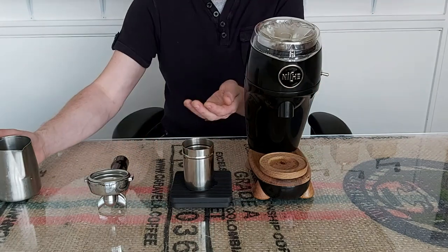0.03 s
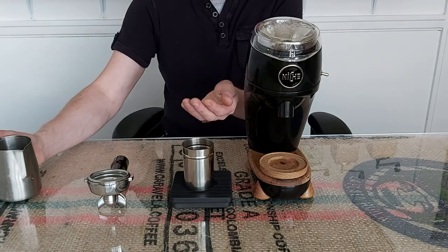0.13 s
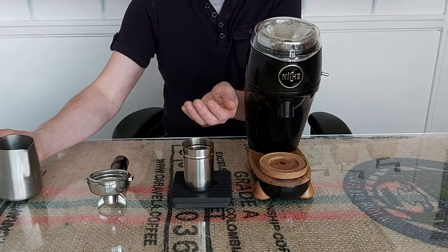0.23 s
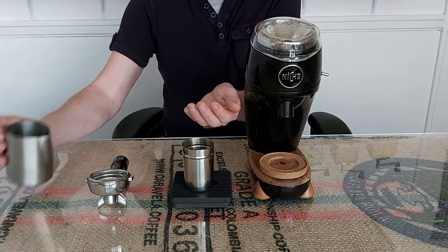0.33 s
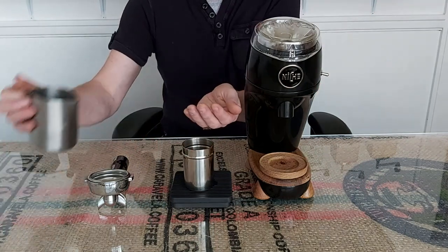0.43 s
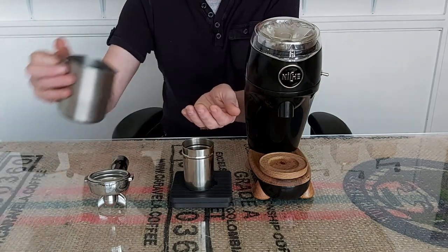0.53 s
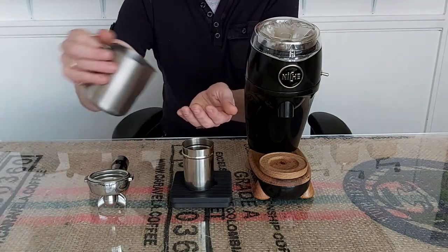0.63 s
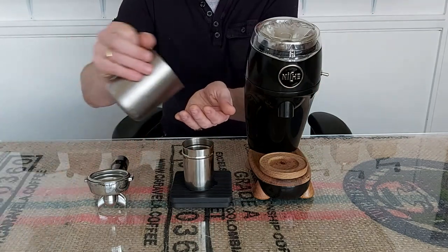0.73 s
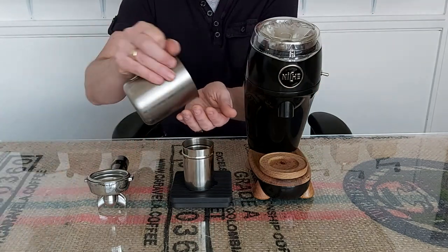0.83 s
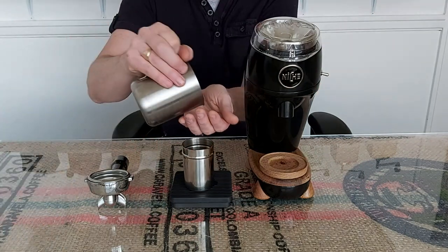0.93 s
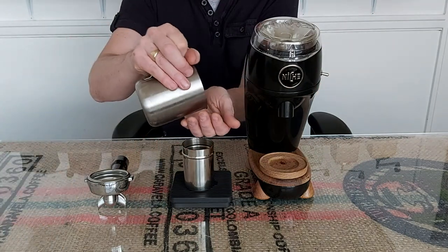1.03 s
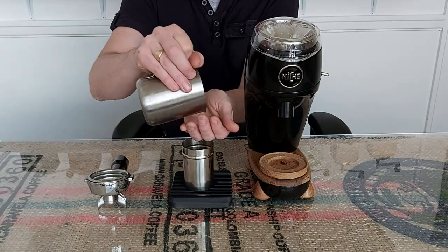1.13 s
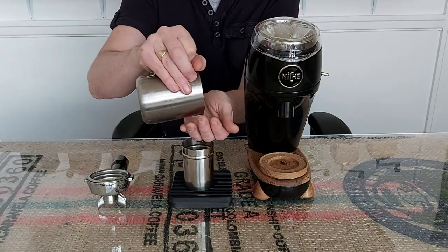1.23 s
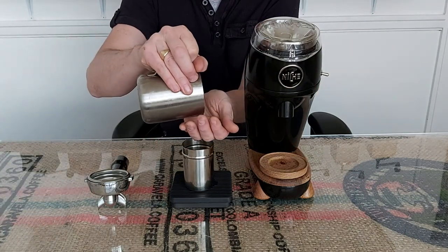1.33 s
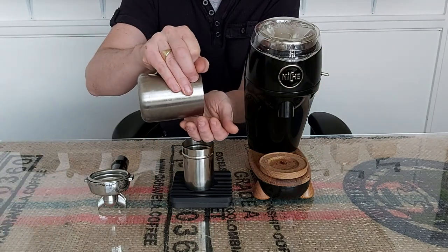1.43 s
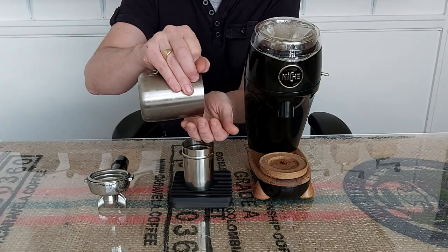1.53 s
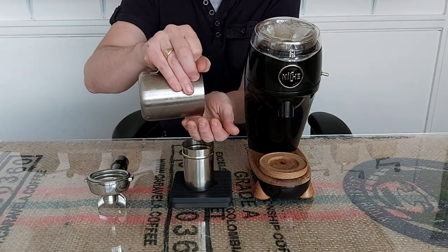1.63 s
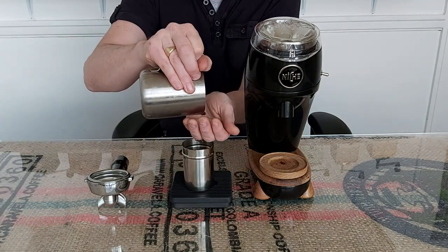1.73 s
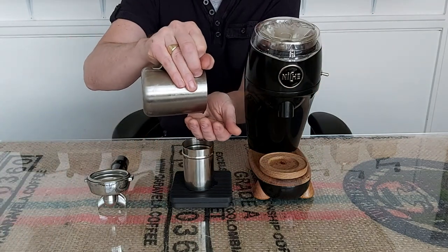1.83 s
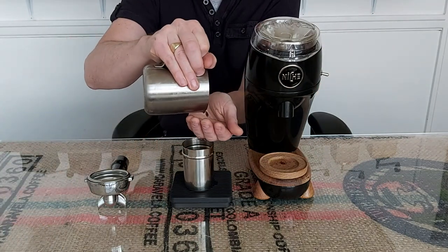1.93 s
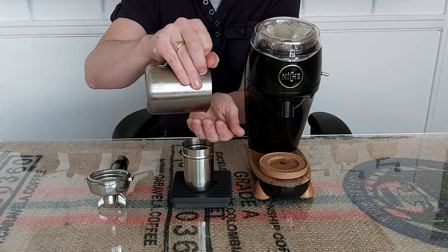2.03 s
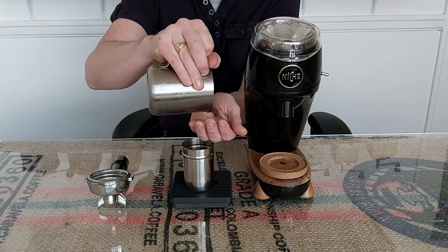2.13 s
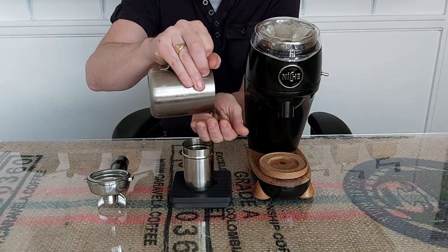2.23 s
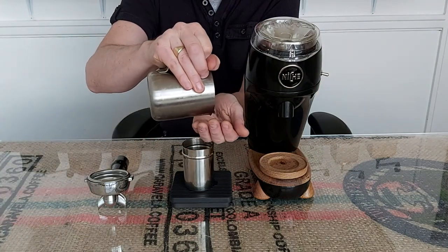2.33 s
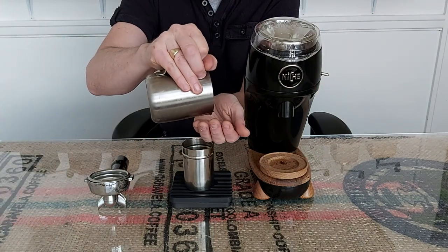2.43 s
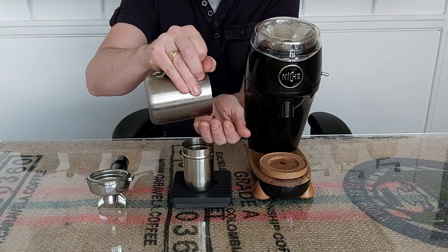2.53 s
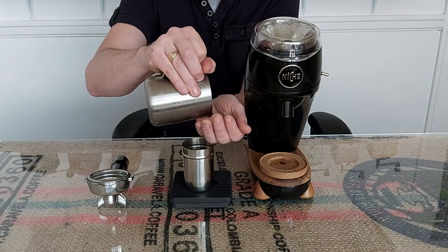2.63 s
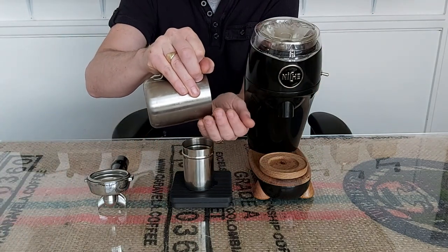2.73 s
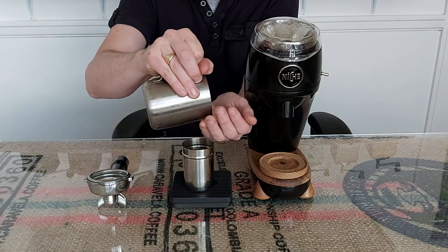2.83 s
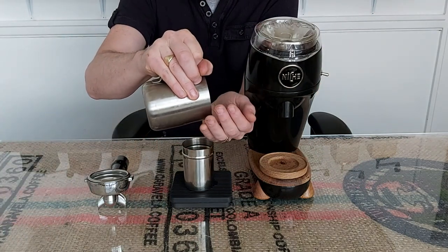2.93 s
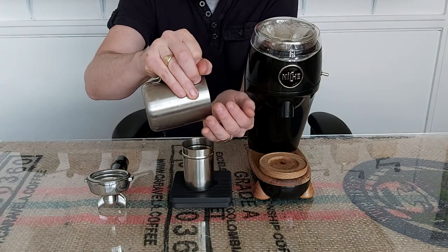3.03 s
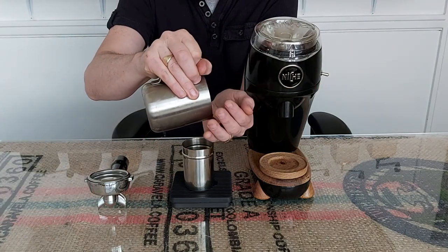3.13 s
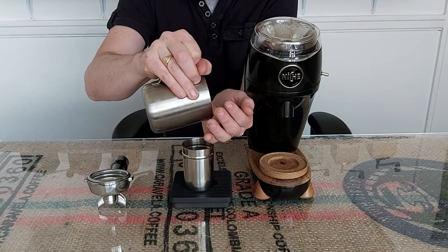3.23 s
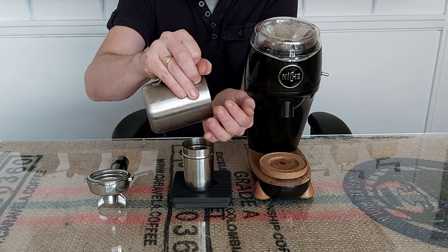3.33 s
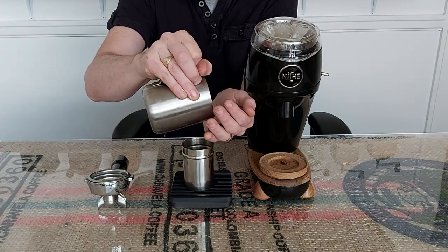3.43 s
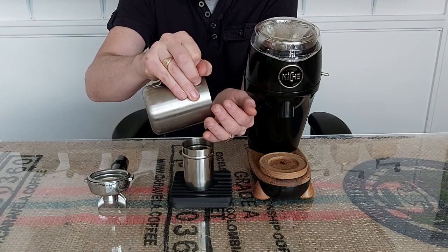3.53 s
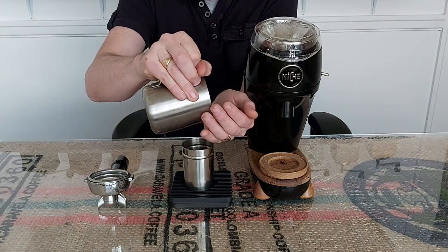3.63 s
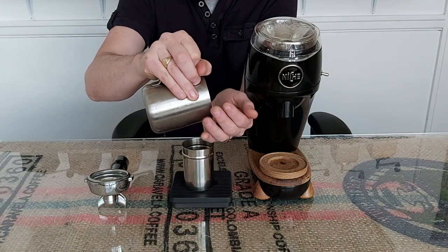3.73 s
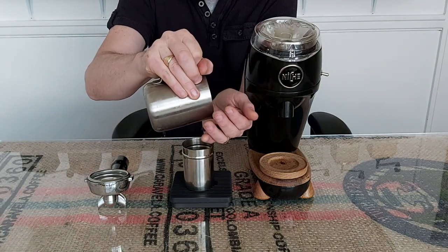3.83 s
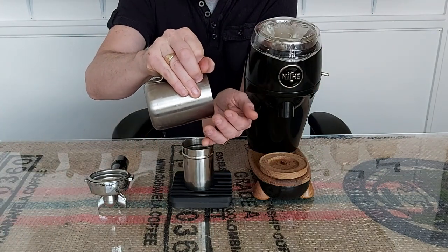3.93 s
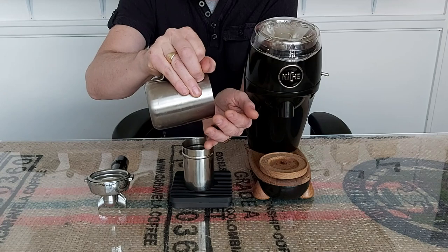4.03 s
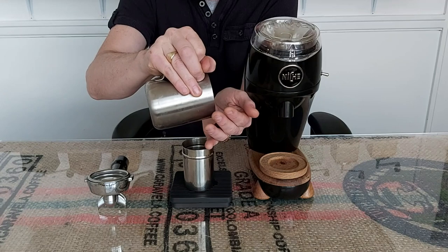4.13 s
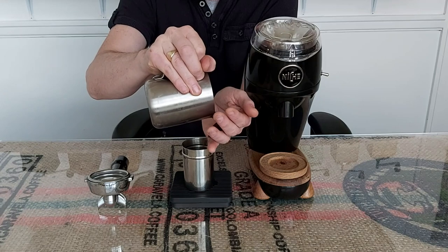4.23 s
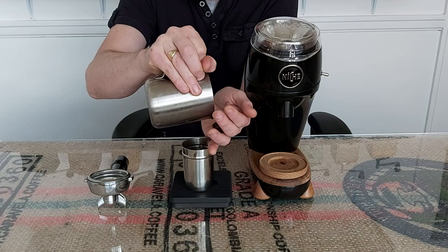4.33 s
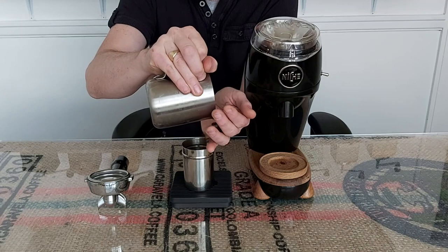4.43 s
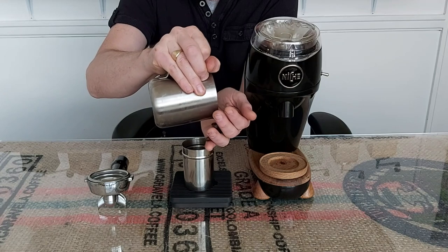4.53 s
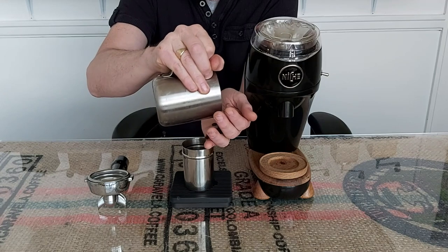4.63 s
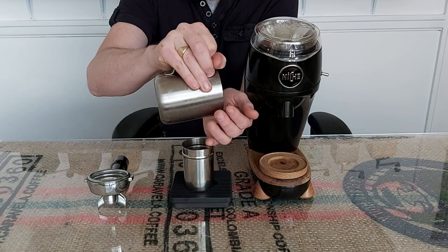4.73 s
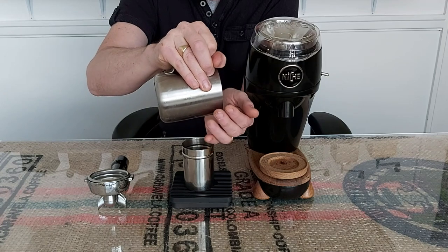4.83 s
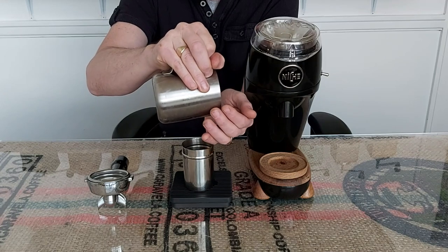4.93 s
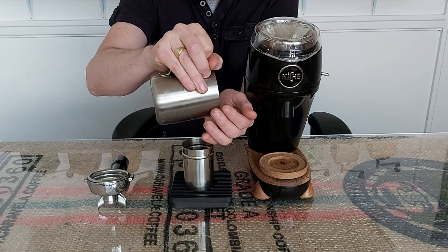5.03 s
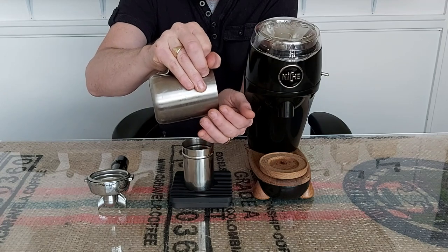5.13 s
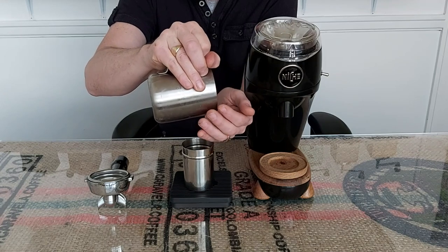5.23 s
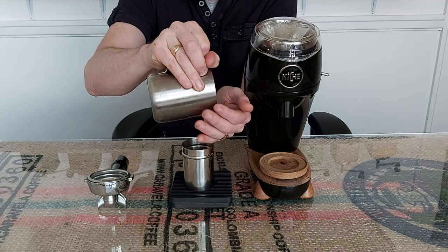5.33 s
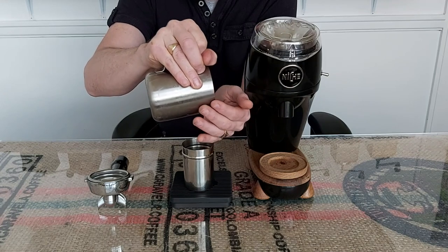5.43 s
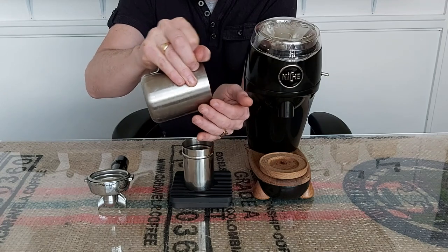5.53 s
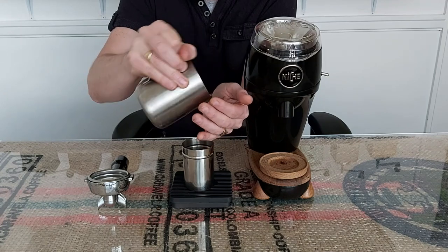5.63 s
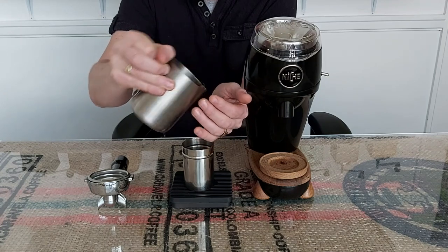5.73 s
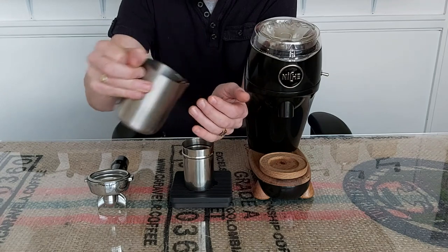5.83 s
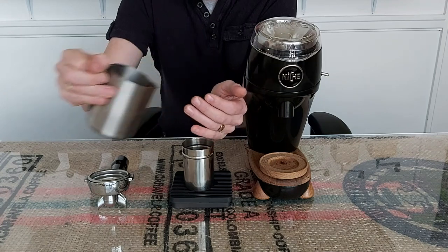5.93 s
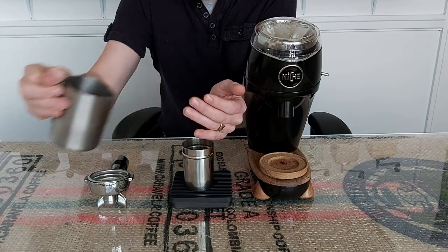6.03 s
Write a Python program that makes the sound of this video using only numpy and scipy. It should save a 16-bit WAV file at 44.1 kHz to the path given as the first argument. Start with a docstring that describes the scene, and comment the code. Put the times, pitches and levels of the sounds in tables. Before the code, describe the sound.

A jug is picked up with soft taps and sleeve rustle, and beans rattle lightly in its steel body. After dry ticks in the hand and a handling bump, louder bright clinks land in a small metal cup, the ring shortening as it fills. A few stray beans bounce hard on the table. Near microphone, short hard-walled kitchen reverb, very low hum and distant engine.

```python
"""Coffee beans slide and rattle in a tilted steel jug, trickle over a hand and drop into a small steel cup.
They click on the cup floor, ring its wall, tick in the palm, and a few skip over the table top; sleeves rub,
a mid-band wash swells with the beans, and an engine far outside drones past a quiet kitchen with a low hum.
Bean hits are sums of decaying sines; cloth, wash, rumble and air are shaped noise; drone and hum are wavering sines.
"""
import sys
import numpy as np
from scipy import signal
from scipy.fft import rfft, irfft
from scipy.io import wavfile
from scipy.ndimage import uniform_filter1d

SR = 44100
rng = np.random.default_rng(int(sys.argv[2]) if len(sys.argv) > 2 else 0)


def dump(signal):
    """Clip the signal to [-1, 1] and save it as 16-bit WAV at the path in sys.argv[1]."""
    limited = np.clip(np.atleast_2d(signal).T, -1, 1)
    pcm = np.round(limited * 32767).astype(np.int16)
    wavfile.write(sys.argv[1], SR, pcm)


N = 268965

MODE_DB = -19  # one mode of a click re the level listed for its bean
EMPTY_UNTIL_S = 3.1  # from here on the filling cup damps its own ring


def undb(db):
    """Amplitude of a level in dB."""
    return 10 ** (np.asarray(db) / 20)


def unit(x):
    """Scale to rms 1."""
    return x / np.sqrt(np.mean(x ** 2))


def decay(t, t60):
    """Exponential envelope that falls 60 dB in t60 seconds."""
    return np.exp(-np.log(1000) * t / t60)


def curves(breakpoints):
    """Columns of a breakpoint list, read at every sample."""
    s, *columns = np.transpose(breakpoints)
    return [np.interp(np.arange(N) / SR, s, c) for c in columns]


def band(lo_hz, hi_hz):
    """Noise of rms 1 between two edges."""
    sos = signal.butter(2, [lo_hz, hi_hz], "band", fs=SR, output="sos")
    return unit(signal.sosfilt(sos, rng.standard_normal(N)))


def walk(rate):
    """Random levels that glide to a new value every 1 / rate s; rms 1."""
    k = int(SR / rate)
    steps = np.repeat(rng.standard_normal(N // k + 1), k)
    return unit(uniform_filter1d(steps, k)[:N])


def wavering_sine(hz, drift_hz, rate):
    """Sine whose pitch drifts at random around hz."""
    return np.sin(2 * np.pi * np.cumsum(hz + drift_hz * walk(rate)) / SR)


def air():
    """The quiet kitchen: noise shaped in the spectrum, and a low fridge hum that wavers."""
    # kitchen tone: f/Hz, spectral weight/dB
    kitchen = [(30, -37), (42, 1), (137, -12), (313, -18), (426, -41), (537, -14), (595, -31), (810, -38),
               (1710, -31), (10100, -27), (14500, -39), (16500, -58)]
    kitchen_db, fridge_db = -70.5, -69.5
    f = np.maximum(np.fft.rfftfreq(N, 1 / SR), 1)
    hz, db = np.transpose(kitchen)
    weight = undb(np.interp(np.log(f), np.log(hz), db))
    hiss = unit(irfft(rfft(rng.standard_normal(N)) * weight, N))
    hum = wavering_sine(47.5, 0.81, rate=2.2)
    return undb(kitchen_db) * hiss + undb(fridge_db + 2.5 * walk(6.8)) * hum


def engine():
    """A drone that grows as the engine nears and swells once, its low rumble, and tyre roar."""
    # engine outside: t/s, rumble level/dB, road roar level/dB
    passing = [(0, -63, -74), (.24, -71, -65), (.4, -76, -67.5), (1.7, -80.5, -68.5), (1.97, -114, -75),
               (2.44, -79, -73.5), (2.6, -66.5, -69), (3.4, -82, -75.5), (3.94, -70, -63),
               (4.3, -73.5, -66.5), (4.55, -68.5, -54.5), (4.8, -77.5, -57), (5.05, -62, -56),
               (5.7, -62.5, -54.5), (6.1, -61.5, -56)]
    start_db, growth_db_per_s = -69.5, 2
    swell_s, swell_width_s, swell_db = 5.45, 0.19, -43.5
    t = np.arange(N) / SR
    rumble_db, roar_db = curves(passing)
    size = undb(start_db + growth_db_per_s * t + 0.7 * walk(7.3))
    size += undb(swell_db) * np.exp(-((t - swell_s) / swell_width_s) ** 2)
    drone = wavering_sine(62.3, 0.724, rate=3.05)
    rumble = band(174.5, 196.0) + 0.41 * band(106, 140.0) + .5 * band(254, 259) + 1.04 * band(90, 232)
    roar = undb(roar_db + 1.0 * walk(13)) * band(600, 1067)
    return size * drone + undb(rumble_db) * rumble + roar


def wash():
    """A flickering mid-band noise that swells with the sliding beans and the table thuds."""
    # swells of the wash: t/s, level/dB
    swells = [(0, -89), (.22, -65), (.6, -73.5), (1.15, -67.5), (1.48, -60.5), (1.72, -57.5), (1.95, -73.5),
              (2.3, -59.5), (2.46, -72), (2.65, -65.5), (3.1, -62), (3.45, -84), (3.9, -62.5), (4.35, -71),
              (4.7, -51.5), (5.05, -48.5), (5.5, -74.5), (6.1, -75)]
    level_db, = curves(swells)
    return undb(level_db + 2.5 * walk(60)) * band(955, 2400)


def sleeves():
    """Cloth rubs as an arm moves: a hollow body near 350 Hz and a thin hiss."""
    # sleeve rubs: t/s, length/s, level/dB
    rubs = [(0.195, 0.57, -58.5), (1.18, 0.051, -61.5), (2.5, 0.32, -60.5), (2.966, 0.14, -57),
            (3.45, 0.046, -64), (3.762, 0.8, -67), (4.655, 0.21, -71), (5.296, 1, -67)]
    rise_db_per_s, fall_db_per_s, hiss_db = 296, 92, -15
    t = np.arange(N) / SR
    move = np.zeros(N)
    for s, length, db in rubs:
        before, after = np.maximum(s - t, 0), np.maximum(t - s - length, 0)
        move += undb(db - rise_db_per_s * before - fall_db_per_s * after)
    cloth = band(285, 389) + 0.63 * band(162, 630) + undb(hiss_db) * band(3300, 10700)
    return move * undb(1.0 * walk(9.7) + 2.0 * walk(30)) * cloth


def handling():
    """Hands on jug and table: taps and scuffs of band noise that start sharply and die away."""
    # touches: t/s, level at the onset/dB, centre f/Hz, width/Hz, t60/s
    touches = [(0.209, -49, 900, 1390, 0.021), (0.247, -50, 700, 1090, 0.12), (0.47, -49, 1480, 1190, .03),
               (.468, -55, 1520, 120, 0.37), (.47, -50, 10300, 1500, 0.033), (0.891, -54, 1350, 1350, 0.45),
               (2.476, -62, 350, 285, 0.15), (3.024, -49, 696, 890, 1), (3.025, -47.5, 2370, 3120, 0.56),
               (3.025, -49.5, 8900, 10700, .4), (3.415, -55, 396, 302, 0.19)]
    t = np.arange(N) / SR
    out = np.zeros(N)
    for s, db, hz, width_hz, t60 in touches:
        envelope = (t > s) * decay(np.abs(t - s), t60)
        noise = band(max(hz - width_hz / 2, 100), hz + width_hz / 2)
        out += undb(db + 0.47 * walk(150)) * envelope * noise
    return out


def strike(s, mode_db, modes, scatter_db, size=2000):
    """Every blow rings the modes (f/Hz, level/dB, t60/s) with its own strengths and signs."""
    hz, db, t60 = np.array(modes).T[:, :, None]
    t = np.arange(size) / SR
    chance = rng.standard_normal((len(s), 2, len(modes)))
    level_db = np.reshape(mode_db, (len(s), -1)) + db.T + scatter_db * chance[:, 0]
    gain = undb(level_db) * np.sign(chance[:, 1])
    blows = gain @ (decay(t, t60) * np.sin(2 * np.pi * hz * t))
    out = np.zeros(N + size)
    for at, blow in zip(np.clip(s * SR, 0, N).astype(int), blows):
        out[at:at + size] += blow
    return out[:N]


def clicks(s, db, hz, modes, hollow, dense_db, dense_t60_s, fall_db, ring_db=0, hollow_db=0, low_hz=2700):
    """Bean clicks: strong modes amid a thicket of short ones, loudest near hz, and any air inside."""
    focus_db, focus_octaves = 5.5, .1  # each click favours the short modes right at its brightest pitch
    thicket_hz = np.linspace(2900, 16000, num=70) + rng.normal(0, 61, size=70)
    thicket = [(f, dense_db, dense_t60_s * (6000 / f) ** .5) for f in thicket_hz]
    strong = np.arange(len(modes) + len(thicket)) < len(modes)
    modes = list(modes) + thicket
    octaves = np.log2(np.array(modes)[:, 0] / hz[:, None])
    mode_db = db[:, None] - fall_db * octaves ** 2
    mode_db = mode_db + ~strong * focus_db * np.exp(-(octaves / focus_octaves) ** 2)
    mode_db = mode_db + np.outer(ring_db, strong)
    shell = strike(s, mode_db, modes, 2.96)
    # so small a contact radiates no bass
    shell = signal.sosfilt(signal.butter(6, low_hz, "high", fs=SR, output="sos"), shell)
    if len(hollow) == 0:
        return shell
    return shell + strike(s, db + hollow_db, hollow, 3.9, size=6000)


def heap(flow, spread_db, count):
    """Times, levels and pitches of a random patter, mostly faint, that follows the flow."""
    s, db = np.transpose(flow)
    place, size, pitch = rng.random((count, 3)).T
    at = s[0] + place * (s[-1] - s[0])
    level_db = np.interp(at, s, db) - spread_db * np.log(1 - size)
    return at, level_db, 4000 * 3.5 ** pitch


def table():
    """Dry ticks of beans skipping over the table and the softer, slower thud of the top under them."""
    # beans that miss the cup: t/s, level/dB, thud re that level/dB
    spills = [(4.4807, -29, -20), (4.563, -4.5, -17.5), (4.6558, -10, -18), (4.661, -6.5, -14.5),
              (4.6957, -12, -23), (4.7067, -4.5, -15.5), (4.7895, -14.5, -8.5), (4.809, -14, -25),
              (4.8284, -15.5, -7.5), (4.8564, -12, -16), (4.8918, -10.5, -12.5), (4.9477, -12, -9),
              (4.9756, -18.5, -26), (4.9904, -24, -30), (4.9984, -23, -19), (5.005, -16, -10),
              (5.0304, -31, -22), (5.0664, -18, -10.5), (5.0724, -30, -14), (5.0804, -20.5, -8),
              (5.1018, -32, -19), (5.1114, -25, -14), (5.1228, -25, -20), (5.1344, -30, -3.5),
              (5.1437, -26, -11), (5.1562, -29, -14), (5.1644, -27, -8.5), (5.1756, -22.5, -10)]
    # modes of the table top: f/Hz, level/dB, t60/s
    top_modes = [(448, -29, 0.032), (670, -16.5, 0.03), (987, -18.5, 0.025), (1366, -11.5, 0.018),
                 (1700, -9, 0.026), (2220, -1, 0.008), (2700, -7.5, 0.0094)]
    brightest_hz, push_s = 8420, 0.000085  # push_s: time constant of the soft contact
    s, db, thud_db = np.transpose(spills)
    push = np.arange(400) / SR / push_s
    contact = push * np.exp(-push) / (push_s * SR)
    thud = np.convolve(strike(s, db + thud_db, top_modes, 4.0), contact)[:N]
    thud = signal.sosfilt(signal.butter(2, 350, "high", fs=SR, output="sos"), thud)
    return clicks(s, db + MODE_DB, brightest_hz + 0 * s, [], [], -4.0, 0.013, 11.2) + thud


def palm():
    """Bean on bean in the palm: dry ticks that ring no steel."""
    # ticks: t/s, level/dB, brightest f/Hz
    ticks = [(2.0212, -43.5, 7530), (2.3344, -35, 13600), (2.3467, -28.5, 9370), (2.361, -27.5, 12100),
             (2.368, -32, 9600), (2.3744, -29, 12200), (2.3814, -35, 11400), (2.4002, -34.5, 7040),
             (2.453, -34, 10900), (2.4723, -35, 11600), (2.492, -45, 9310), (2.5476, -60, 7800),
             (2.6394, -30, 14300), (2.6474, -33.5, 7970), (2.715, -43, 7740), (2.8818, -49, 7800),
             (2.901, -35.5, 11900), (3.347, -39.5, 11300), (3.3774, -51, 7270)]
    s, db, hz = np.transpose(ticks)
    return clicks(s, db + MODE_DB, hz, [], [], -1.8, 0.012, 6.8)


def jug():
    """Single knocks on steel over the patter of the sliding heap; the tipped mouth lets the air sound out."""
    # beans knocking in the jug: t/s, level/dB, brightest f/Hz
    hits = [(0.8743, -44, 9350), (0.8914, -27.5, 4960), (0.932, -29.5, 5370), (0.9521, -28, 7200),
            (0.9622, -17, 7200), (0.985, -42, 7290), (0.992, -19, 9900), (1.0106, -22, 10100),
            (1.021, -23.5, 9700), (1.054, -26, 7250), (1.0848, -32, 5720), (1.1023, -25.5, 10200),
            (1.113, -28.5, 7200), (1.1455, -33.5, 5720), (1.196, -38, 5950), (1.2044, -31, 7740),
            (1.276, -27.5, 10100), (1.295, -35, 12700), (1.3139, -33.5, 12800), (1.3356, -45, 10300),
            (1.3568, -36.5, 7060), (1.3688, -32, 7560), (1.3826, -34, 7800), (1.4116, -29, 6200),
            (1.45, -23, 6400), (1.505, -25, 7240), (1.5272, -26, 7280), (1.5566, -35, 7740),
            (1.6034, -42, 7300), (1.6198, -33, 7700), (1.6623, -27, 10400), (1.674, -33, 10400),
            (1.705, -29.5, 10100), (1.717, -26, 6100), (1.7421, -35, 6800), (1.7597, -27, 9700),
            (1.8113, -34.5, 7450), (1.833, -39, 5660), (1.86, -30, 8180), (1.8715, -27, 6200),
            (1.9016, -29, 8100), (1.9375, -41, 7460), (2.0353, -42.5, 7600), (2.074, -43, 4590),
            (2.0929, -30, 6690), (2.127, -35, 6620), (2.1484, -30, 7660), (2.1945, -24, 7750),
            (2.2345, -18.5, 5960), (2.2804, -30, 7760), (2.3006, -24, 7800), (2.5799, -34, 6000),
            (2.6742, -38, 4950), (2.7354, -38.5, 5400), (2.7633, -40, 4730), (3.1465, -26.5, 6200),
            (3.1844, -30, 5900), (3.1979, -30, 5930), (3.2345, -37.5, 6050), (3.2817, -43, 6720)]
    # small clicks of the moving heap: t/s, level of the faintest/dB
    sliding = [(0.68, -91), (.77, -73), (0.85, -89), (1.05, -67.5), (1.31, -75.5), (1.58, -54.5),
               (1.92, -99), (2.13, -57.5), (2.25, -54), (2.42, -77.5), (2.76, -91), (3.0, -90), (3.2, -87),
               (3.4, -90)]
    # steel of the jug: f/Hz, level/dB, t60/s
    steel = [(3500, -2, 0.054), (4740, -2, 0.047), (5390, 2.5, 0.028), (5630, -4, 0.04), (5870, -1, 0.048),
             (6740, 0, 0.023), (7200, -3.5, 0.05), (7420, 0, 0.042), (7780, 1, 0.037), (9810, -1, 0.022),
             (10230, -1, 0.08), (11800, 1.5, 0.021), (13300, -5, .02)]
    # air inside the jug: f/Hz, level/dB, t60/s
    inside = [(670, -19, 0.097), (1231.3, -7.5, 0.063), (1524, -11, 0.02), (2490, -17, 0.067)]
    tilted_s, upright_db = 1.3, -11  # the air is quieter until the jug is tilted
    s, db, hz = np.transpose(hits)
    knocks = clicks(s, db + MODE_DB, hz, steel, inside, -8.0, 0.034, 4.25,
                    low_hz=3460, hollow_db=upright_db * (s < tilted_s))
    s, db, hz = heap(sliding, 2.6, count=1100)
    patter = clicks(s, db, hz, steel, inside, -7.5, 0.027, 13.3,
                    low_hz=3280, hollow_db=upright_db * (s < tilted_s))
    return knocks + patter


def cup_floor():
    """Beans click on the cup floor, and those already in the cup deaden it for the later drops."""
    # beans landing in the cup: t/s, level/dB, brightest f/Hz
    drops = [(3.4164, -12.5, 13150), (3.491, -38, 11400), (3.5427, -27, 7540), (3.6177, -37, 5400),
             (3.6631, -5.5, 13150), (3.6825, -23, 7460), (3.702, -11, 7300), (3.7174, -19.5, 9630),
             (3.7622, -15.5, 7200), (3.791, -5.5, 7100), (3.8034, -17, 7350), (3.8192, -13, 12100),
             (3.8323, -22, 7600), (3.8863, -25, 5500), (3.9654, -14.5, 5330), (4.0314, -32, 5900),
             (4.0517, -34, 5840), (4.0806, -12, 11900), (4.164, -26, 10500), (4.1764, -41, 5360),
             (4.2193, -23, 7700), (4.2562, -12, 10880), (4.284, -31, 7610), (4.3036, -24, 5300),
             (4.3345, -11, 7940), (4.3884, -25, 11300), (4.4287, -9, 8200), (4.4655, -33, 5350),
             (4.5408, -15, 14500), (4.549, -29, 5810), (4.5524, -17, 9100), (4.5875, -17, 11400),
             (4.738, -18.5, 5800), (4.8506, -14.5, 9620), (4.905, -9.5, 12100), (4.9158, -20, 7100),
             (5.1982, -11.5, 7000), (5.2108, -27, 7160), (5.2714, -44, 7240), (5.3059, -9.5, 11700),
             (5.3285, -11, 12400), (5.449, -31, 3090), (5.5476, -17, 7060), (5.6007, -26, 7400),
             (5.6432, -29, 7500), (5.6595, -15, 13800), (5.6664, -18.5, 7720), (5.6854, -26, 7700),
             (5.6889, -13, 7300), (5.7096, -30, 7620), (5.7602, -17, 12600), (5.8178, -11.5, 7800),
             (5.8626, -22.5, 7640), (5.9444, -48, 7200), (6.0097, -16.5, 3030), (6.0204, -27, 7460),
             (6.0274, -31, 7600), (6.061, -32, 7300), (6.0934, -37, 8240)]
    # small clicks of the moving heap: t/s, level of the faintest/dB
    settling = [(3.4, -78), (3.7, -67.5), (3.87, -51), (4.2, -72.5), (4.47, -46), (4.6, -73), (4.75, -58),
                (5.17, -64.5), (5.37, -59.5), (5.55, -81), (5.7, -71), (5.83, -56), (6.0, -74.5),
                (6.1, -62.5)]
    # steel of the floor: f/Hz, level/dB, t60/s
    steel = [(3170, -0.5, 0.029), (3520, 8.5, 0.0067), (6940, 0.5, 0.017), (7633, 7, 0.02),
             (8600, -12.5, 0.004), (11460, -1.5, 0.028), (12500, 3.5, 0.012), (12900, 8, 0.011),
             (14300, -19, 0.012), (15560, -8, 0.042)]
    # air inside the cup: f/Hz, level/dB, t60/s
    inside = [(842, -20.5, 0.072)]
    muffle_db_per_s = -1.5
    s, db, hz = np.transpose(drops)
    muffle_db = muffle_db_per_s * np.maximum(s - EMPTY_UNTIL_S, 0)
    landings = clicks(s, db + MODE_DB, hz, steel, inside, -6.5, 0.011, 3.1, ring_db=muffle_db)
    patter = clicks(*heap(settling, 3.225, count=900), steel, inside, -4.5, 0.0065, 13.2)
    return landings + patter


def cup_wall():
    """Beans that strike the free wall set off its long ring, which shortens as the cup fills."""
    # blows on the wall: t/s, level of the low modes/dB, modes above 7 kHz re the low ones/dB
    blows = [(3.433, -55.5, 4.5), (3.5871, -52, -3.5), (3.7188, -37.5, 5), (3.8298, -23.5, -1),
             (3.8869, -31.5, 3), (3.8994, -32, 2.5), (4.0757, -38.5, 6), (4.3013, -31, -7),
             (4.3904, -35.5, -1), (4.4817, -31.5, -3), (4.5408, -38.5, 1), (4.6564, -38.5, 1),
             (4.7066, -33.5, -16), (4.8498, -39.5, 4), (4.9053, -45.5, 6), (5.1964, -53, -14),
             (5.512, -59, 1.5), (5.712, -55, 6), (5.759, -50, 8)]
    # pitches of the wall: f/Hz
    wall_hz = [905, 2500, 4647, 5360, 5840, 7286, 7616, 8178, 9633, 10371, 11303, 11492, 12280, 12823,
               14565, 14812, 15180, 15350]
    # ring of each pitch: level/dB, t60 in the empty cup/s
    wall = [(-25.5, 1), (-38, .9), (-14, 0.87), (-5, 0.84), (-6, 1), (-15, 0.78), (4, 0.059), (-10, 0.27),
            (-2.5, 0.24), (-5, 0.29), (-4, 0.18), (-2, 0.095), (-29, .4), (-2.5, 0.18), (2, 0.088),
            (-19, 0.22), (-23, .33), (-20, .4)]
    damping_per_s = 0.2
    out = np.zeros(N)
    for s, db, high_db in blows:
        free = 1 / (1 + max(damping_per_s * (s - EMPTY_UNTIL_S), 0))
        modes = [(f, d + high_db * (f > 7000), t60 * free) for f, (d, t60) in zip(wall_hz, wall)]
        out += strike(np.array([s]), db, modes, scatter_db=1.5, size=24000)
    return out


def room(x):
    """Hard walls return a diffuse noise tail whose treble dies slightly sooner."""
    tail_db, t60_s, treble_t60_s = -6.5, 0.36, 0.35
    t = np.arange(SR // 2) / SR
    low = unit(uniform_filter1d(rng.standard_normal(len(t)), size=8))
    tail = low * decay(t, t60_s) + rng.standard_normal(len(t)) * decay(t, treble_t60_s)
    tail *= np.clip(t / 0.002, 0, 1)  # fade in over 2 ms
    tail /= np.sqrt(np.sum(tail ** 2))
    return x + undb(tail_db) * signal.fftconvolve(x, tail)[:N]


def scene():
    """The beans sound in the room; wash, arms, engine and kitchen air are added dry."""
    beans = table() + palm() + jug() + cup_floor() + cup_wall()
    return (air() + engine() + wash() + sleeves() + handling() + room(beans))[None]


def record(dry):
    """A steep low-pass removes the extreme treble above 16.3 kHz."""
    return signal.sosfilt(signal.ellip(10, .2, 80, 16300, fs=SR, output="sos"), dry)


dry = scene()
out = record(dry)
dump(out)
```